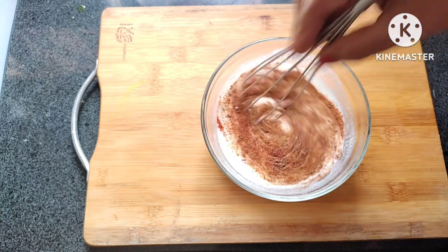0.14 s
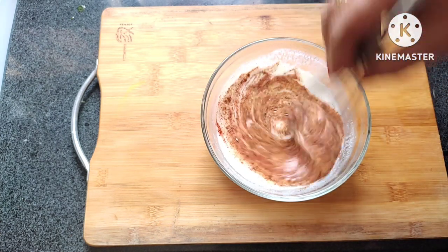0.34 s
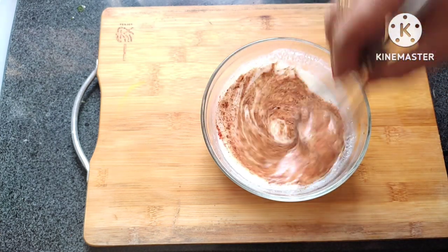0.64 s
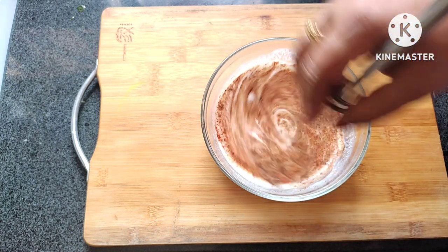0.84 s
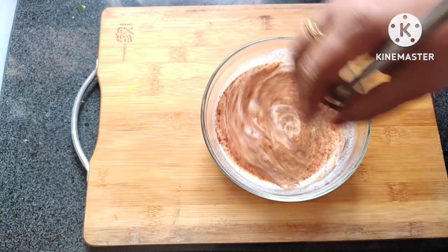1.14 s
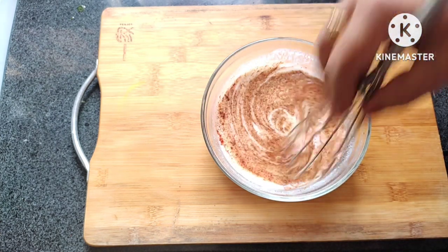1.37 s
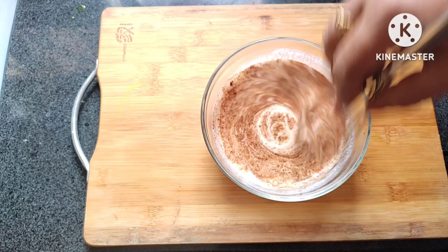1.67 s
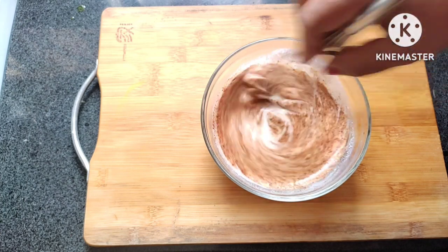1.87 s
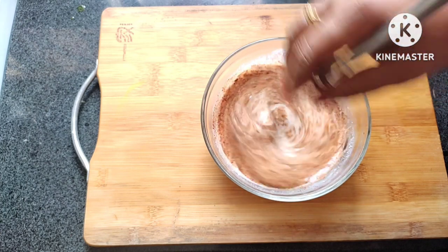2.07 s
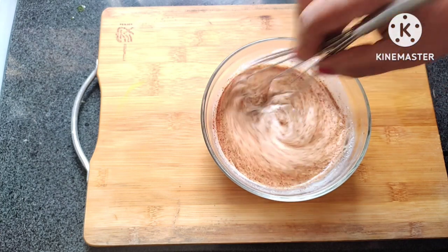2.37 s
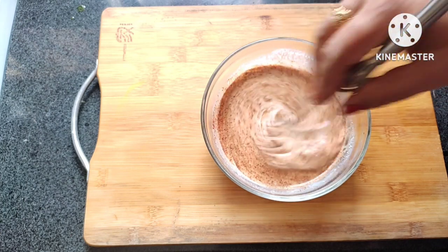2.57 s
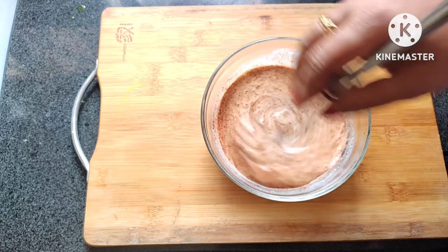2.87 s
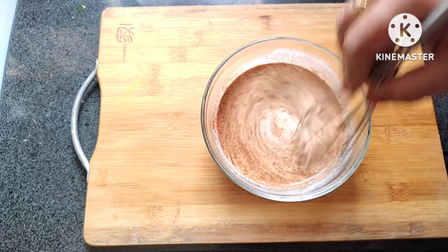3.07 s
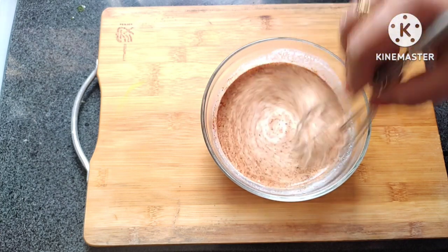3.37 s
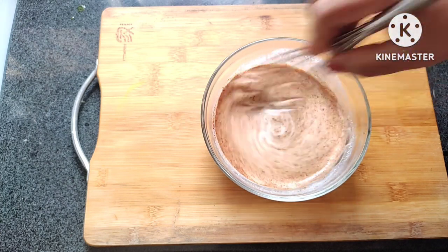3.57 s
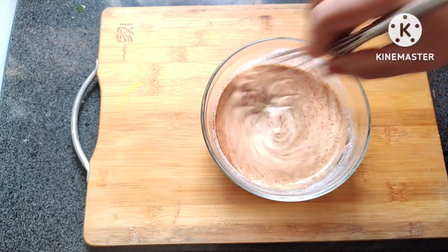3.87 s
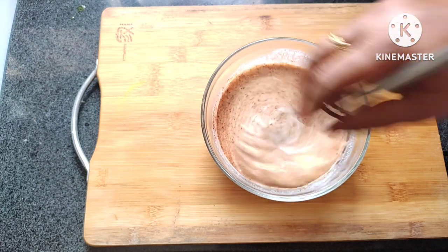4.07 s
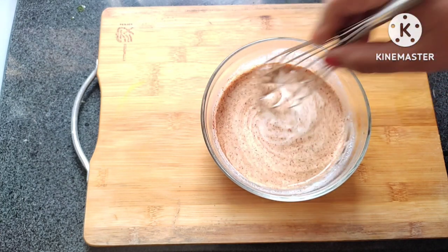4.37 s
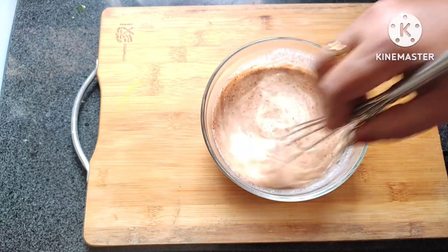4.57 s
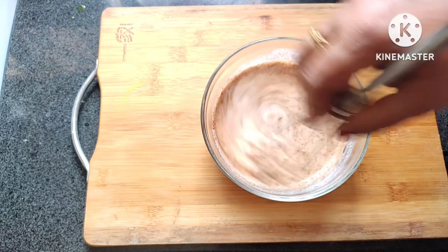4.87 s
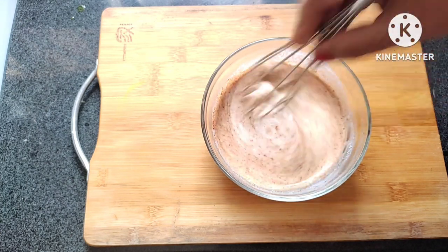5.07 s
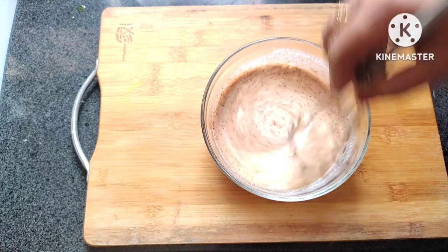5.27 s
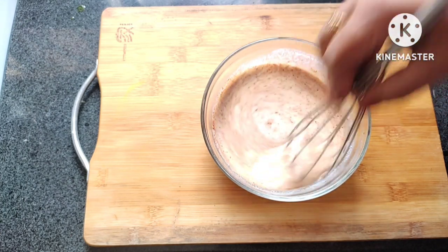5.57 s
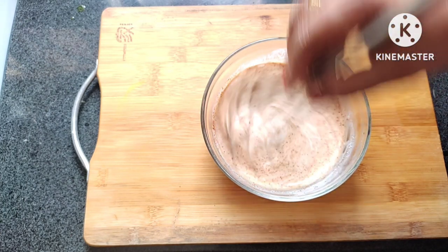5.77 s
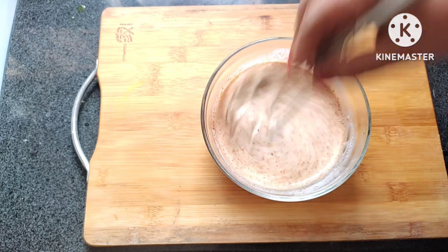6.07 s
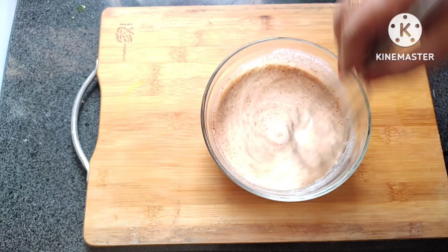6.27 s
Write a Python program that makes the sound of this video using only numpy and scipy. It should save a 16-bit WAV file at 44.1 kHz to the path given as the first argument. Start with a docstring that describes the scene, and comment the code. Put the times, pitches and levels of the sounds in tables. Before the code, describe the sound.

Close, rapid whisking in a glass bowl: bright uneven metal-on-glass ticks, short glassy rings and a soft hissing scrape, with faint refrigerator hum behind.

```python
"""A glass bowl is still ringing from a blow as a wire whisk beats curd in it, on a wooden board close under
a phone with two microphones. Each blow is a noise tick and knock, and sets decaying sines for the rim modes.
Filtered noise scrapes softly through the curd all along. A fridge hums in wavering sines over a low kitchen
rumble of noise; one hum tone stands out for a while after two seconds. Some of the strongest blows come
around five seconds, just after the scrape has sunk briefly."""
import sys
import numpy as np
from scipy import signal
from scipy.fft import rfft, irfft
from scipy.io import wavfile
from scipy.ndimage import uniform_filter1d

SR = 44100
rng = np.random.default_rng(int(sys.argv[2]) if len(sys.argv) > 2 else 0)


def generate_wav(sig):
    """Save sig (samples, or channels by samples) to the path in sys.argv[1] as 16-bit PCM at SR."""
    pcm = np.round(np.clip(np.atleast_2d(sig).T, -1, 1) * 32767).astype(np.int16)
    wavfile.write(sys.argv[1], SR, pcm)


N = 283601
T = np.arange(N) / SR
OPPOSITE = np.array([[1], [-1]])  # left and right move opposite ways
CONTACT_S = 0.0039  # a wire's press on the glass, before each layer's own stretch

# Wire meets glass, source levels before each layer's own gains: start_s, tick_db, low_ring_db,
# main_ring_db, high_ring_db, lingering_main_ring_db, main_ring_left_minus_right_db
BLOWS = [(0.171, -60, -49, -63, -79, -51, 0), (0.403, -41.5, -58, -52, -68, -72, -7),
         (0.47, -38, -57, -52, -63, -65, -10), (0.5872, -46.5, -28.5, -54, -64, -49.5, -17.5),
         (0.7368, -45, -38, -52, -51, -39, -12), (0.7515, -51, -37, -43, -42.5, -42.5, -7.5),
         (0.8929, -23, -27, -33, -35.5, -41, -10.5), (1.0463, -28.5, -35.5, -32.5, -42.5, -56, -6),
         (1.088, -63, -48, -44, -46.5, -45, -6), (1.1845, -35, -31, -32, -50.5, -40, -8),
         (1.3706, -44, -43, -57, -68, -47, -7), (1.5494, -31, -39, -35.5, -46, -49, -14),
         (1.574, -41, -35, -40.5, -52.5, -50.5, -14), (1.7736, -37, -52, -63, -56, -50, -3),
         (2.014, -22.5, -35.5, -31.5, -41.5, -39, -7.5), (2.1395, -34.5, -34, -32.5, -39.5, -42.5, -1),
         (2.244, -34.5, -52, -58, -56, -54, 14), (2.3034, -39, -32, -60, -55, -47.5, -7),
         (2.41, -35, -29, -36, -41, -47, 2), (2.5187, -39, -47, -43.5, -78, -68, 6),
         (2.575, -32.5, -41, -64, -59, -42, -8.5), (2.795, -36, -63, -46.5, -61, -83, 5),
         (2.9899, -33, -45, -38, -63, -57, -9), (3.095, -36.5, -79, -77, -81, -85, 10),
         (3.191, -40, -81, -67, -82, -75, -1), (3.26, -37, -72, -47.5, -56.5, -51.5, -11),
         (3.385, -36, -77, -55, -82, -58, -11), (3.539, -32, -75, -47, -55, -78, -7),
         (3.5885, -41, -43, -35.5, -55, -77, -3), (3.736, -28.5, -43, -50, -58, -64, 2),
         (3.831, -41, -44, -39.5, -47.5, -76, -13.5), (4.005, -35.5, -82, -70, -65, -72, 5),
         (4.0581, -30, -45, -44, -47, -52, -9), (4.1245, -26.5, -52, -40, -38.5, -41.5, 1),
         (4.1931, -51, -41, -44, -57, -49.5, -6), (4.208, -58, -50, -50, -57, -58, -8),
         (4.298, -58, -62, -64, -70, -52.5, 0), (4.5067, -35, -37, -30.5, -51.5, -61, -7.5),
         (4.6009, -33, -36, -57, -62, -53, -1), (4.726, -52, -76, -69, -78, -64, 0),
         (4.7712, -40.5, -44.5, -47.5, -49.5, -51, -14.5), (4.918, -20, -29.5, -22.5, -32.5, -68, 0),
         (4.9574, -68, -50, -46, -42, -35, -3), (5.019, -35, -46, -65, -56, -42, 7),
         (5.105, -24, -30, -55, -31, -37, -3), (5.2395, -17.5, -31.5, -22, -37.5, -24.5, -6.5),
         (5.3447, -34, -56.0, -36, -54, -42, 2), (5.3972, -55, -51, -63, -44, -44.5, -8),
         (5.5707, -24, -33, -38, -34, -44, -7), (5.7302, -33.5, -52, -41, -56, -53, 1),
         (5.7573, -37.5, -43, -66, -43, -66, -1), (5.855, -47, -54, -46, -55, -65, 0),
         (6.045, -43.5, -41, -62, -45, -56, -2), (6.095, -33.5, -42, -35.5, -54, -41, -3),
         (6.2119, -24, -39, -42, -40.5, -42, -8), (6.335, -40, -40, -45, -46, -45, -1),
         (6.4118, -31.5, -62, -36.5, -59.0, -45, -9)]
# Rim modes of the bowl: pitch_hz, t60_s, left_minus_right_db, left_lead_rad,
# scraped_level_db (against the hiss), scraped_t60_s
RINGS = [(975, 0.45, 0.5, 2.4, -11, .06), (2134, 0.11, 0, 1.8, -1.5, .18), (3530, 0.25, 0, 1.04, -13, .06)]


def undb(db):
    """Gain of a level in dB."""
    return 10 ** (np.asarray(db) / 20)


def unit(x):
    """Scale to rms 1."""
    return x / np.sqrt(np.mean(x ** 2))


def along(table, column=1, size=N):
    """A column of a (Hz, ..) table on the bins of an FFT, interpolated over log frequency."""
    rows = np.array(table)
    hz = np.maximum(np.arange(size // 2 + 1) * SR / size, 1)
    return np.interp(np.log(hz), np.log(rows[:, 0]), rows[:, column])


def colour(x, table):
    """Causal minimum-phase filter that follows (Hz, dB) points."""
    cepstrum = irfft(np.log(undb(along(table, size=2048))))
    # folding the cepstrum forward in time makes the response causal
    cepstrum[1:1024] *= 2
    cepstrum[1025:] = 0
    taps = irfft(np.exp(rfft(cepstrum)))[:1024]
    if x.ndim > 1:
        taps = taps[None]
    return signal.oaconvolve(x, taps, axes=-1)[..., :N]


def walk(rate):
    """Random levels held 1 / rate s and slewed twice; spread near 1."""
    hold = int(SR / rate)
    steps = np.repeat(rng.standard_normal(N // hold + 1), hold)
    return 1.3 * uniform_filter1d(uniform_filter1d(steps, hold), hold)[:N]


def sides(db):
    """Left and right gains for a balance in dB."""
    return undb(np.array([[db], [-db]]) / 2)


def mode(x, hz, t60):
    """A decaying resonance driven by x."""
    pole = np.exp(2j * np.pi * hz / SR - np.log(1000) / (t60 * SR))
    return signal.lfilter([1], [1, -pole], x).imag


def flicker(x, split_hz, depth_db, rate):
    """The dull and the bright part of a sound change level apart."""
    dull = signal.sosfilt(signal.butter(4, split_hz, fs=SR, output="sos"), x)
    bright = x - dull
    return dull * undb(depth_db * walk(rate)) + bright * undb(depth_db * walk(rate))


def kitchen():
    """Gently wavering rumble of filtered noise, alike in both microphones in the bass."""
    # Rumble spectrum: frequency_hz, relative_level_db (per Hz), left_right_likeness (0-1),
    # left_minus_right_db
    rumble_bands = [(22, -44, .95, 0), (45, -15, .96, 0), (75, -11, .97, 0), (100, 2, .97, 0),
                    (125, -2, .96, 0), (155, 0, .95, 0), (200, -4, .93, 0), (330, -2.5, .9, -1),
                    (420, -9, .5, -4), (520, -12, .3, -5), (680, -18, .1, 2), (1000, -17, .5, 0),
                    (2000, -22, .3, 0), (3200, -27, .1, 0), (4000, -37, 0, 0), (9000, -43, 0, 0)]
    like = np.clip(along(rumble_bands, column=2), 0, 1)
    lean = undb(along(rumble_bands, column=3) / 2)
    mid, side = rfft(rng.standard_normal((2, N)))
    both = np.sqrt(1 + like) * mid + np.sqrt(1 - like) * side * OPPOSITE
    both = np.array([lean, 1 / lean]) * both
    rumble = unit(irfft(both * undb(along(rumble_bands)), N))
    return rumble * undb(-51 + 1.2 * walk(5))


def fridge():
    """Multiples of the compressor's turning rate, each wavering alone."""
    turning_hz = 48.85
    # Hum tones: multiple_of_turning_rate, level_db, left_minus_right_db,
    # waver_db (also scales the phase drift; the sign only flips the drift)
    hum_tones = [(2, -59.5, 1.5, 5), (4, -70, 1.5, 6), (7, -63, -0.5, -3), (9, -68.5, -11.5, 3),
                 (10, -63.5, -6, -1.1), (15, -74.5, 12.5, 2.5)]
    # The fourth multiple stands out a while: begin_s, end_s, level_db
    hum_swell = (2.125, 2.534, -54.5)
    out = 0
    for multiple, db, pan_db, waver_db in hum_tones:
        phase = 2 * np.pi * multiple * turning_hz * T
        phase = phase + 0.33 * waver_db * walk(6) - 0.11 * pan_db * OPPOSITE
        level = undb(db + waver_db * np.tanh(walk(14)))
        out = out + np.sqrt(2) * sides(pan_db) * level * np.sin(phase)
    begin, end, swell_db = hum_swell
    swell = uniform_filter1d(((T > begin) & (T < end)) * 1., int(.08 * SR))
    return out + np.sqrt(2) * undb(swell_db) * swell * np.sin(2 * np.pi * 4 * turning_hz * T)


def scrape():
    """Wires drag along the glass: a hiss of tiny slips with small catches, which also feeds the rim modes."""
    # Course of the scrape: time_s, hiss_level_db
    scrape_course = [(0, -54.5), (.45, -59.5), (.75, -54.5), (1.25, -56.5), (1.5, -57.5), (2.1, -54),
                     (2.7, -57.5), (3.95, -57.5), (4.2, -54), (4.35, -60.5), (4.5, -68.5), (4.75, -55.5),
                     (5.3, -54), (5.52, -55), (5.8, -56), (5.98, -59), (6.15, -56), (6.43, -53)]
    # Spectrum of the hiss: frequency_hz, relative_level_db
    scrape_spectrum = [(600, -34.5), (1000, 13), (1600, -1), (2100, 21.5), (2800, 4), (3400, 12),
                       (4200, 3.5), (5500, 9), (11000, 2.5), (13500, -2.5), (15300, -4.5)]
    catches_per_s, catch_decay_s = 43, 0.0043  # decay to 1/e
    catches = (rng.random(N) < catches_per_s / SR) * undb(6 + 8 * rng.random(N))
    catches = signal.lfilter([1], [1, -np.exp(-1 / (catch_decay_s * SR))], catches)
    slips = rng.standard_normal((2, N)) * undb(2.5 * rng.exponential(size=N))
    grains = slips * (1 + .3 * catches)
    out = unit(colour(grains, scrape_spectrum))
    out = flicker(out, split_hz=6000, depth_db=1.3, rate=45)
    out = flicker(out, split_hz=10700, depth_db=1.08, rate=16)  # wet strokes swell and sink
    for hz, _, pan_db, _, db, t60 in RINGS:
        # the scraped rim modes sound all along, their strength wavering a little
        waver = undb(1.5 * walk(9))
        out = out + undb(db) * sides(pan_db) * unit(mode(grains * waver, hz, t60))
    return out * undb(np.interp(T, *np.transpose(scrape_course)))


def rings():
    """Each blow takes over the rim: it sets the strength of every mode anew, which then dies away."""
    # Left over from a blow just before: low_ring_db, main_ring_db, high_ring_db,
    # lingering_main_ring_db, main_ring_left_minus_right_db
    ring_at_start = (-47, -33.5, -46.5, -37, -5.5)
    linger_t60_s = 0.63
    # a push that rings as loud as it ticks needs this long to build the ring; sharper ticks less
    swell_s = 0.00023
    blows = np.array(BLOWS)
    start = np.r_[0, blows[:, 0] + .4 * CONTACT_S]
    last = np.searchsorted(start, T, side="right") - 1  # the latest blow at each moment
    age = T - start[last]
    linger_db = np.r_[ring_at_start[3], blows[:, 5]]
    balance_db = np.r_[ring_at_start[4], blows[:, 6]]
    build_s = np.clip(swell_s * undb(blows[:, 3] - blows[:, 1]), 1 / SR, .008)
    build_s = np.r_[1 / SR, build_s]
    rise = int(.003 * SR)  # smooths the handover between blows
    out = 0
    for k, (hz, t60, pan_db, lead, *_) in enumerate(RINGS):
        is_low, is_main, is_high = k == 0, k == 1, k == 2
        db = np.r_[ring_at_start[k], blows[:, 2 + k] - 15 * is_low]
        # the high ring holds at first and then drops fast
        bend = 1.17 if is_high else 1
        fade = undb(db[last] - 60 * (age / t60) ** bend)
        fade = fade + is_main * undb(linger_db[last] - 60 * age / linger_t60_s)
        strength = uniform_filter1d(fade * (1 - np.exp(-age / build_s[last])), rise)
        # the blow lands elsewhere on the rim each time, so pitch, phase and balance shift
        turn, place = rng.standard_normal((len(start), 2)).T
        pitch = hz * (1 + .0008 * place[last])
        phase = 2 * np.pi * np.cumsum(pitch) / SR
        phase = phase + uniform_filter1d(np.cumsum(turn)[last], rise) + .2 * walk(25)
        apart = uniform_filter1d(lead + 0.35 * turn[last], rise) / 2
        lean = pan_db + is_main * uniform_filter1d(balance_db[last], rise)
        gains = undb(np.array([lean, -lean]) / 2)
        waver = undb(1.97 * walk(40))  # moving curd loads the rim unevenly
        out = out + gains * strength * waver * np.sin(phase + apart * OPPOSITE)
    return out


def contacts(level_db, stretch, bounce_db, alike):
    """A short noise rattle for each blow, and a weaker one as the next wire of the loop lands."""
    sharp = 0.85  # under 1, a contact bites at once and lets go slowly
    out = np.zeros((2, N + SR))
    t = np.arange(SR // 20) / SR
    length = stretch * CONTACT_S
    first = (t / length) ** sharp * np.exp(-t / length)
    share = np.clip(alike, 0, 1)  # power common to both microphones
    for blow, db in zip(BLOWS, level_db):
        later, weaker = rng.random(2)
        rattle = rng.standard_normal((3, len(t)))
        # every rattle equally strong
        energy = np.sum((first * rattle) ** 2, axis=1, keepdims=True)
        rattle *= np.sqrt(np.sum(first ** 2) / energy)
        after = np.maximum(t - .007 - 0.0019 * later, 0)
        bounce = after / length * np.exp(1 - after / length)
        shape = first * np.exp(sharp) + undb(bounce_db - 8.3 * weaker) * bounce
        both = np.sqrt(share) * rattle[0] + np.sqrt(1 - share) * rattle[1:]
        start = int(blow[0] * SR)
        out[:, start:start + len(t)] += undb(db) * shape * both
    return out[:, :N]


def pushes(level_db):
    """One clean single-sample push for each blow."""
    out = np.zeros(N)
    out[(np.array(BLOWS)[:, 0] * SR).astype(int)] = undb(level_db)
    return out


def ticks():
    """Steel on glass: a bright tick with short upper modes, a duller knock of bowl and board, thuds of the rim."""
    # Spectrum of the tick: frequency_hz, relative_level_db
    tick_spectrum = [(300, -21), (2500, 0), (4000, -6), (7000, -0.5), (10800, -4.5), (12000, -3),
                     (13500, 1.5), (14600, -16), (15300, 0)]
    # Spectrum of the knock: frequency_hz, relative_level_db
    knock_spectrum = [(200, -36), (330, 4), (600, -7), (1400, 1), (1850, 7.5), (2600, 3.5), (3200, -6.5),
                      (4500, -16)]
    # Faint upper modes of the glass: pitch_hz
    overtone_pitches = (5215, 7219, 9445, 11960, 14696)
    # Strength and decay of those modes: drive_gain_db, t60_s
    overtone_decays = [(-40.5, 0.068), (-43, 0.067), (-42.5, 0.043), (-41, 0.053), (-59, 0.06)]
    # Partners of the rim modes that the curd deadens: pitch_hz, t60_s, level_against_ring_column_db
    thud_modes = [(1017, 0.049, -5.5), (2084, 0.094, -4.5), (3460, 0.037, -5)]
    blows = np.array(BLOWS)
    tick_db, low_ring_db = blows[:, 1], blows[:, 2]
    bright = contacts(tick_db, stretch=0.35, bounce_db=-21, alike=0.065)
    out = flicker(colour(bright, tick_spectrum), split_hz=12000, depth_db=2.4, rate=9.6) * undb(-4.5)
    for hz, (db, t60) in zip(overtone_pitches, overtone_decays):
        # the level of each upper mode wanders slowly at random
        out += undb(db + 2.5 * walk(10)) * mode(bright, hz, t60)
    for k, (hz, t60, db) in enumerate(thud_modes):
        out += undb(db) * mode(pushes(blows[:, 2 + k]), hz, t60)
    # the knock follows a blend of the tick and low ring levels
    tick_share = 0.53
    knock_db = 0.5 + tick_share * tick_db + (1 - tick_share) * low_ring_db
    knock = contacts(knock_db, stretch=0.58, bounce_db=-8.5, alike=0.16)
    return out + colour(knock, knock_spectrum)


def room(x):
    """Board, counter and walls send back a short diffuse tail of decaying noise."""
    t60_s, tail_db = 0.27, -6.5
    t = np.arange(SR // 4) / SR
    tail = rng.standard_normal((2, len(t))) * undb(-60 * t / t60_s) * (t > .002)
    tail = tail / np.sqrt(np.sum(tail ** 2, axis=1, keepdims=True))
    return x + undb(tail_db) * signal.oaconvolve(x, tail, axes=-1)[:, :N]


def scene():
    """Ticks and scrape with the room's tail, then the rings without it, over the kitchen and the fridge."""
    return room(ticks() + scrape()) + rings() + kitchen() + fridge()


def record(dry):
    """The left port lifts the top octave; a steep drop near 15.5 kHz leaves the very top faint, and a
    low-pass ends it."""
    # Resonance of the left microphone port: frequency_hz, gain_db
    left_port = [(5000, -0.5), (8000, -4), (10500, 3), (12000, 11.5), (13800, 13), (15300, 8)]
    drop_hz, drop_db, top_hz = 15480, -21, 16100
    ports = np.array([colour(dry[0], left_port), dry[1]])
    ports = colour(ports, [(drop_hz - 40, 0), (drop_hz + 40, drop_db)])
    return signal.sosfilt(signal.ellip(8, .2, 70, top_hz, fs=SR, output="sos"), ports)


dry = scene()
out = record(dry)
generate_wav(out)
```